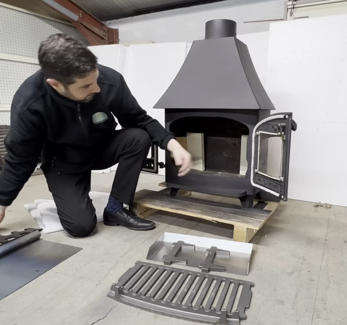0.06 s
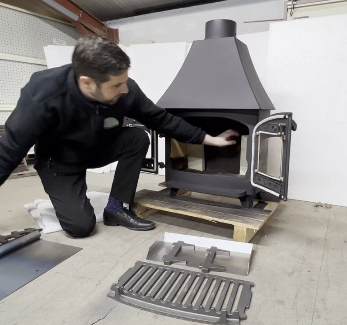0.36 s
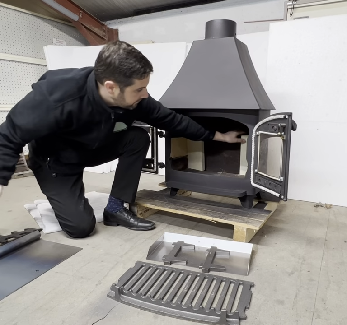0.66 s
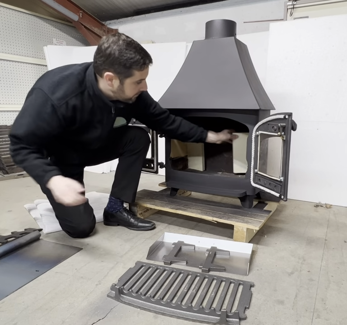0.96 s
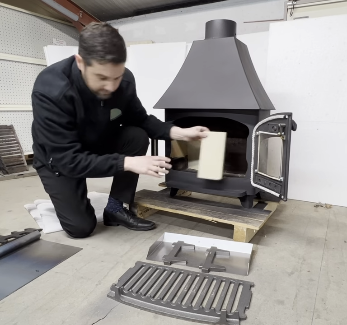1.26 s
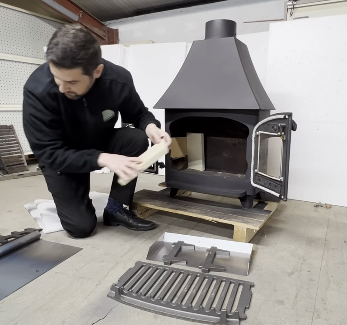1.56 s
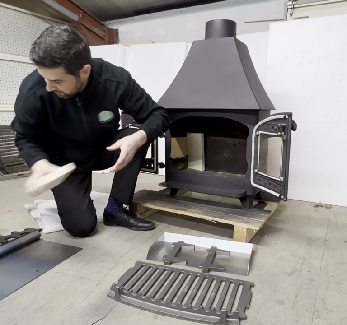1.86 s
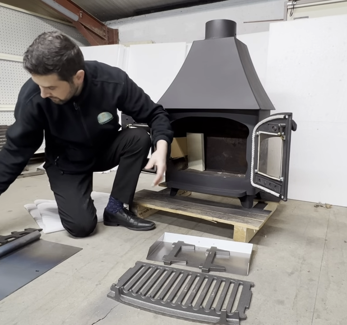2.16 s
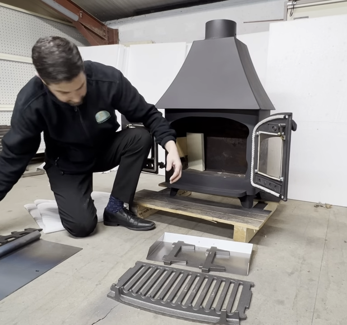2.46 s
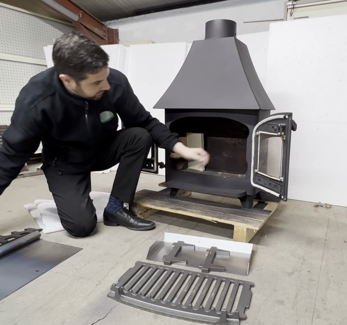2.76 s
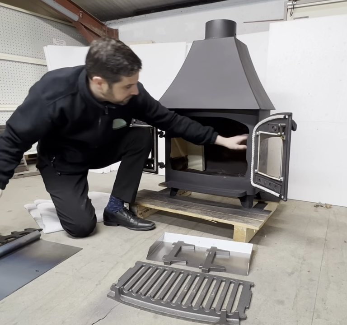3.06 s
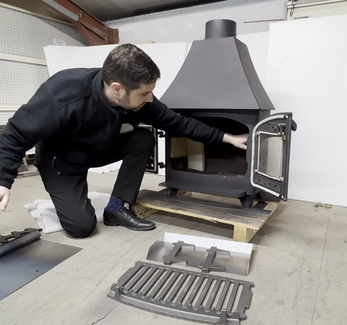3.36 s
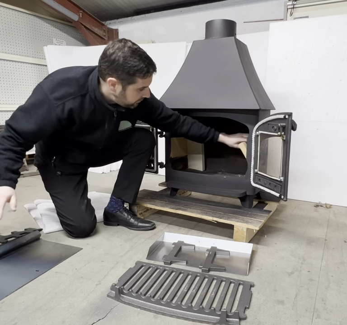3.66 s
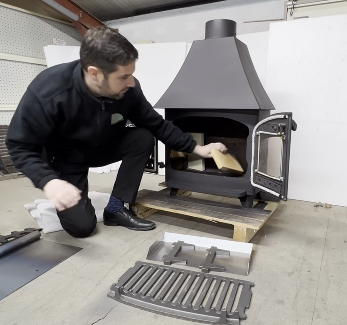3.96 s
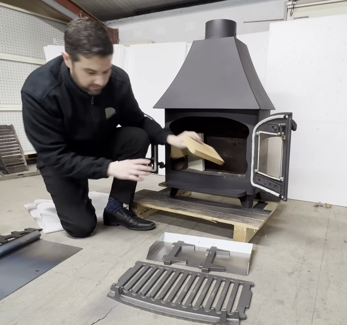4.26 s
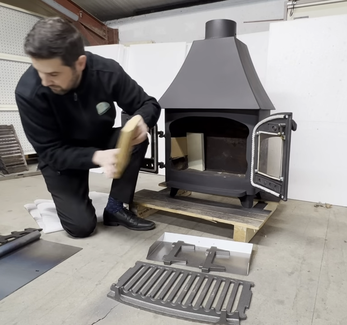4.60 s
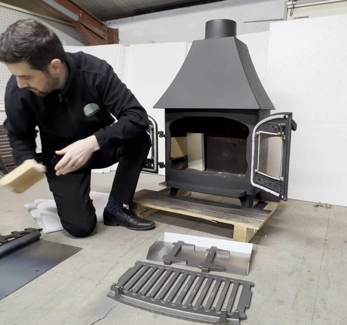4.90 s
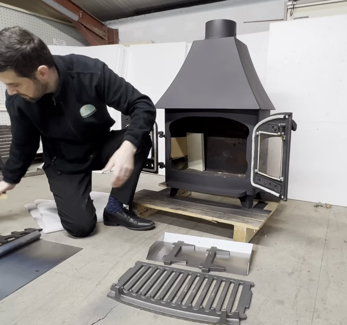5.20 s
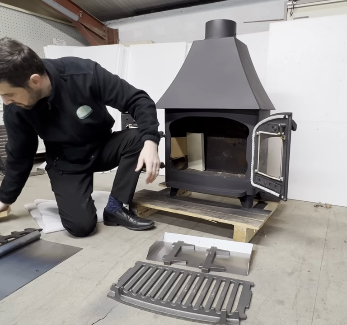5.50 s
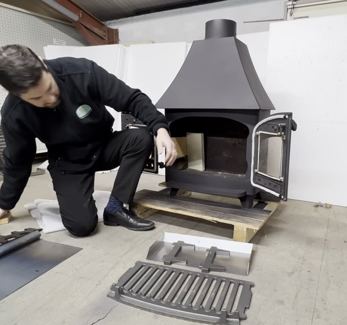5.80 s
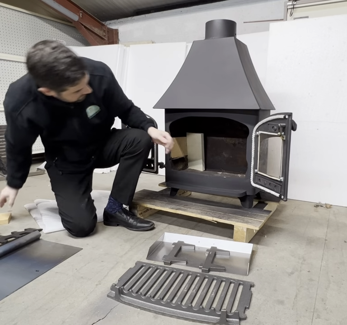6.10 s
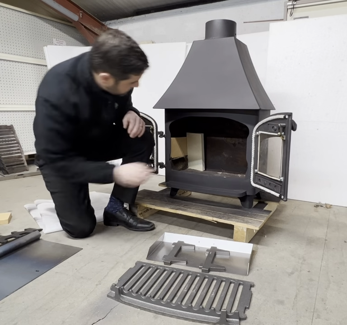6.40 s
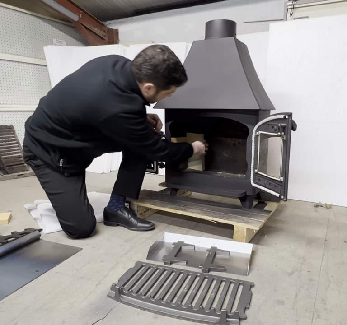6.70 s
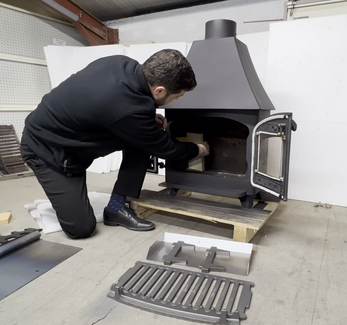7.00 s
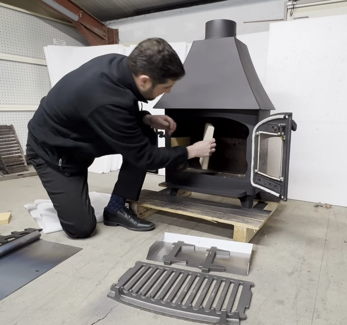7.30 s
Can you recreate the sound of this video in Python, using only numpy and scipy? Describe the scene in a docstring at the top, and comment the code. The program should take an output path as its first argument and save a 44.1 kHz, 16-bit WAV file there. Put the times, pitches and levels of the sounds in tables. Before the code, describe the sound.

Two light bricks are worked out of a metal stove with ringing knocks and gritty scraping, then set down with dull thuds.

```python
"""A dull thud with a sharp tick on top: a light firebrick lands on a workshop floor. Two bricks are worked
out of a steel wood stove. Each knocks in the firebox, whose panels boom and ring, slides through the
hands and lands edge first in a few thuds; the second is dragged free in gritty, faintly squeaking jerks.
A fleece jacket rustles with each reach. A low hum, a rumble and a thin hiss lie under the room."""
import sys
import numpy as np
from scipy import signal
from scipy.fft import rfft, irfft, next_fast_len
from scipy.io import wavfile

SR = 44100
rng = np.random.default_rng(int(sys.argv[2]) if len(sys.argv) > 2 else 0)


def generate_wav(signal):
    """Clip the signal to [-1, 1] and save it as 16-bit WAV at the path in sys.argv[1]."""
    frames = np.transpose(np.atleast_2d(signal))
    scaled = np.clip(frames, -1, 1) * 32767
    pcm = np.round(scaled).astype(np.int16)
    wavfile.write(sys.argv[1], SR, pcm)


N = 328545

# a brick lands edge first, tips onto its face and settles: (time [s], edge [dB], face [dB], settling [dB],
# time to tip [s], then for the edge contact: brightness [Hz], grit [dB], low cut [Hz])
BRICK_LANDINGS = [(0.116, -20, -22.5, -29, 0.026, 815, -49.5, 62),
                  (0.228, -40.5, -46, -44.5, .05, 500, -64.5, 75),
                  (2.4444, -39.5, -45.5, -44.5, 0.097, 500, -71, 92),
                  (5.33, -64.5, -64.5, -72.5, .022, 448, -78, 150),
                  (5.618, -27.5, -21.5, -41.5, .010, 615, -65.5, 190),
                  (5.755, -32.5, -31.5, -44, .011, 430, -68, 200),
                  (5.842, -34.5, -33.5, -38.5, .017, 334, -60.5, 135)]
SETTLE_S = 0.043  # from the fall onto the face to the last contact
DULLING, DEEPENING, GRIT_STEP_DB = 0.53, 0.85, -5.5  # per contact: duller, deeper, less gritty
# a brick knocks in the firebox:
# (time [s], level [dB], brightness [Hz], panel boom [dB], clink [dB], brick [0 or 1])
FIREBOX_KNOCKS = [(0.575, -46, 6000, -10, -12.5, 0), (0.585, -43, 1010, 13, -16, 0),
                  (0.603, -38.5, 507, 7.5, -14, 0), (0.869, -44.5, 960, 0.5, -5.5, 0),
                  (1.2525, -37.5, 8700, 2.5, 0.5, 0), (1.262, -34.5, 1320, 7, -4.5, 0),
                  (1.2782, -50, 4470, -5, 14.5, 0), (3.653, -60, 895, 17, -3, 1),
                  (3.708, -43.5, 12040, 2, -5, 1), (3.738, -34, 1060, 15, 7.5, 1),
                  (3.742, -37.5, 4930, -26, 2, 1), (3.768, -41, 7900, -10, 6.5, 1),
                  (7.001, -62.5, 2800, 10, -8, 0)]
# the second brick is jerked along the steel until it tears free:
# (start [s], length [s], starting level [dB], swell [dB], brightness [Hz])
BRICK_PULLS = [(2.878, .44, -69.5, 16.5, 1670), (3.369, 0.15, -49, -14.5, 9000),
               (3.54, 0.022, -46, -3.5, 13900), (3.596, 0.21, -55, 12.5, 12500),
               (3.705, 0.069, -32, 6.5, 13100)]
GRAB_S, LET_GO_S = 0.0075, 0.0097  # attack and release of a pull
# the dragged brick catches: (centre time [s], level [dB], pitch [Hz], length [s])
DRAG_SQUEAKS = [(3.164, -72, 4150, 0.099), (3.42, -70, 3450, 0.15), (3.46, -69.5, 6160, .24),
                (3.624, -56, 4640, 0.093)]
# hands and sleeves slide over a brick:
# (peak time [s], level [dB], rise [s], fall [s], ring and skin hiss [dB], brick [0 or 1])
HAND_RUBS = [(0.639, -66, 0.041, 0.04, -21, 0), (0.835, -53.5, 0.016, 0.048, -14, 0),
             (0.876, -59, 0.018, 0.012, -12, 0), (1.768, -57.5, 0.077, 0.04, -50, 0),
             (4.6, -64.5, 0.035, 0.028, -7, 1), (4.8, -56, 0.021, 0.033, 6, 1),
             (5.346, -67, .05, 0.043, -12, 1), (5.831, -46, 0.0047, 0.016, -13, 1),
             (5.975, -58, 0.0081, 0.015, -17, 1), (6.155, -63.5, 0.016, 0.029, -21, 0),
             (6.69, -73, 0.035, 0.02, -29, 0), (7.375, -63, 0.0094, 0.063, -11, 0)]
# a brick is patted, gripped or catches lightly: (time [s], level [dB], brightness [Hz], brick [0 or 1])
BRICK_PATS = [(0.709, -71, 7000, 0), (1.516, -77, 4470, 0), (3.138, -77, 5000, 1), (3.54, -64.5, 11000, 1),
              (3.641, -70, 14200, 1), (4.776, -69, 9300, 1), (5.759, -69, 1680, 1), (6.99, -75, 7060, 0)]
# small dry ticks: (time [s], level [dB], pitch [Hz])
DRY_TICKS = [(0.116, -29, 2800), (2.409, -50.5, 3360), (2.583, -52.5, 3870), (4.945, -53, 4440),
             (5.354, -58, 13000), (5.970, -42.5, 4300)]
# the jacket rustles with a reach or turn: (peak time [s], level [dB], length [s])
JACKET_MOVES = [(0.035, -61, 0.82), (0.64, -62.5, 0.55), (1.62, -67, 1), (3.15, -68, 0.49),
                (4.186, -72, 0.2), (5.354, -71.5, 0.42), (6.547, -70.5, 0.69), (6.698, -71.5, .12),
                (7.425, -67, 0.51)]
STIRRING_DB = -76  # the jacket between movements

# modes of the floor under a brick: (frequency [Hz], level [dB], t60 [s])
FLOOR_MODES = [(90.6, -8.5, 0.25), (121.4, -7, 0.16), (168.9, -3, 0.16), (228, 1, 0.083), (330, -12, 0.15),
               (451, -1.5, 0.043), (792, -4.5, 0.073)]
# modes of the steel firebox: (frequency [Hz], level [dB], t60 [s])
STOVE_MODES = [(140.6, 0, 0.38), (155, -2, 0.22), (199.6, -22, 1.24), (249.6, -21.5, 1.04),
               (297.5, -9, 0.453), (321.5, 3, 0.08), (357.8, -2.5, 0.21), (451, -5.5, 0.26),
               (506, -9, 0.19), (719, -13.5, 0.46), (771, 0, 0.11), (896, -22.5, 0.11), (1006, -14.5, 0.25),
               (1028, -8.5, 0.086), (1076, -13, 0.28), (1127, -15.5, 0.38), (1426, -9.5, 0.16),
               (1644, -17.5, 0.34), (1728, -23.5, 0.21), (2146, -20, 0.14), (2520, -20, 0.11),
               (2570, -33, 0.12), (2920, -56, 0.076)]
# ringing tones heard when the first brick (0) or second brick (1) is struck, some steel ring included;
# a list each: (frequency [Hz], level [dB], t60 [s])
CLINK_TONES = [
    [(443, 5.5, 0.18), (500, 2, 0.15), (1350, -6, 0.086), (2275, -6, 0.033), (3607, -9, 0.032),
     (3770, -21.5, 0.039), (3910, 1, 0.023), (3800, -12.5, 0.059), (4900, -17, 0.046), (5900, -20, 0.091),
     (8090, -20, 0.15)],
    [(1635, 0.5, 0.22), (2346, -8.5, 0.13), (2666, -5, 0.16), (2600, -4, 0.06), (3410, -16, 0.059),
     (3980, -3, 0.04), (4130, 1, 0.069), (4760, -2, 0.061), (5610, -4, 0.044), (6205, 6.5, 0.044),
     (6710, -2, 0.074), (8820, -1.5, 0.043)],
]
# steady low tones: (frequency [Hz], level [dB])
HUM_TONES = [(70, -67.5), (97, -63), (194, -84)]

# the dark bloom of a thud: (frequency [Hz], level [dB])
THUMP_EQ = [(25, -42), (55, -1), (100, 1.5), (190, -0.5), (480, -3), (640, -9), (820, -12.5), (1100, -16.5),
            (1500, -19), (2500, -27.5), (8000, -57.5)]
# the wash of dense steel modes: (frequency [Hz], level [dB])
PANEL_EQ = [(40, -3), (110, -11), (350, -3), (620, -5), (900, 3), (1250, -6), (1750, -14.5), (2500, -15),
            (4000, -20), (9000, -20), (15000, -18.5)]
# brick grinding on steel: (frequency [Hz], level [dB])
GRIND_EQ = [(100, -20), (400, 5), (900, -3.5), (1800, 1), (3000, 1), (4400, -5), (6500, -12), (9000, -11.5),
            (15000, -23)]
# grit, dust and brushing on a brick's face: (frequency [Hz], level [dB])
DUST_EQ = [(100, -8), (500, 1), (1500, 1.5), (2700, 4.5), (4200, -2.5), (6500, -2.5), (9000, -12.5),
           (15000, -12.5)]
# the hiss of dry skin: (frequency [Hz], level [dB])
SKIN_EQ = [(2000, -21), (6000, -5), (10000, -1), (15000, -3)]
# rubbing fleece: (frequency [Hz], level [dB])
FLEECE_EQ = [(120, -1), (400, 6), (900, 0), (2000, 1), (3500, -3), (4900, -4), (6000, -1), (8700, -8),
             (15000, -16.5)]
# the air of the workshop: (frequency [Hz], level [dB])
AIR_EQ = [(76, -46), (130, 1.5), (168, -0.5), (188, -0.5), (276, -6), (447, -9), (890, -10.5),
          (1110, -20.5), (1860, -23), (6000, -51.5), (7800, -58), (13200, -120)]
# thin high hiss: (frequency [Hz], level [dB])
HISS_EQ = [(3000, -37), (5500, -27), (6500, -11), (7300, 6), (8000, -13), (9500, -16), (10800, -23),
           (12500, -8.5), (15500, -16.5)]
# the rumble of the building: (frequency [Hz], level [dB])
RUMBLE_EQ = [(20, -20.5), (33, -8), (46, 0.5), (58, -9), (72, 5.5), (85, -0.5), (100, 2), (120, -6.5),
             (170, -51)]
AIR_DB, HISS_DB, RUMBLE_DB = -70, -75, -60.5

# the room's decay: (frequency [Hz], t60 [s])
ROOM_DECAY = [(80, 1), (250, 0.55), (600, 0.59), (1500, 0.5), (4000, 0.53), (8000, 0.35), (14000, 0.16)]
# the tone of the wall reflections: (frequency [Hz], level [dB])
WALL_EQ = [(60, -19), (300, -6), (800, -8.5), (4000, -1), (15000, -2.5)]
# how alike diffuse sound is in both ears: (frequency [Hz], correlation [0 to 1])
EAR_CORRELATION = [(60, .88), (140, .86), (300, .66), (640, .2), (1400, 0), (3000, 0), (9000, 0),
                   (13000, .3)]
# the two microphone ports: (frequency [Hz], response [dB], left minus right [dB])
MIC_EQ = [(101, -2, -1.2), (347, 0, -1.5), (1240, -2, 2.5), (2630, -6.5, 4), (3200, -6.5, 6), (3680, -4, 2),
          (5190, -4.5, 12), (5170, -14, 16.5), (6760, -4, 7), (7680, -10, 10), (8390, 2, 13.5),
          (9220, 2.5, -5), (10940, -14.5, 9.5), (12120, 4.5, 1), (14430, -7.5, 3.5)]
HIGH_CUT_HZ = 15700


def floor_thuds(left_lead_s=0.0004):
    """The floor answers each of a landing's three contacts with a low knock; grit crunches underneath."""
    out, t = np.zeros((2, N)), np.arange(SR) / SR
    slab = unit_hit(ring(FLOOR_MODES, build_cycles=1.6))
    direct = np.array([slab, np.interp(t - left_lead_s, t, slab)])  # arrives from the left
    for s, edge_db, face_db, settle_db, tip_s, bright_hz, grit_db, low_hz in BRICK_LANDINGS:
        contacts = [(0, edge_db), (tip_s, face_db), (tip_s + SETTLE_S, settle_db)]
        for k, (delay, db) in enumerate(contacts):
            thud = direct + amp(3.5) * tail(THUMP_EQ, rise_s=0.0025, early_db=14, early_s=0.04)
            # each later contact of a landing sounds deeper
            low_cut = signal.butter(2, low_hz * DEEPENING ** k, "highpass", fs=SR, output="sos")
            thud = signal.sosfilt(low_cut, soften(thud, bright_hz * DULLING ** k))
            grit = tail(DUST_EQ, rise_s=0.0033, early_db=-17, early_s=0.028)
            add(out, s + delay, amp(db) * unit_hit(thud) + amp(grit_db + k * GRIT_STEP_DB) * grit)
    return out


def firebox_knocks():
    """A knock sets off the big panels' boom, a clink and a wash of dense steel modes."""
    out = np.zeros((2, N))
    boom = ring([mode for mode in STOVE_MODES if mode[0] < 280], build_cycles=0.17)
    steel = ring([mode for mode in STOVE_MODES if mode[0] >= 280], build_cycles=0.84)
    clinks = [unit_hit(ring(tones, build_cycles=1.3)) for tones in CLINK_TONES]
    for s, db, bright_hz, boom_db, clink_db, brick in FIREBOX_KNOCKS:
        clang = amp(boom_db) * boom + steel + amp(clink_db) * clinks[round(brick)]
        wash = amp(-3) * tail(PANEL_EQ, rise_s=0.00058, early_db=24, early_s=0.06)
        add(out, s, amp(db) * soften(in_room(clang, wet_db=-0.5) + wash, bright_hz))
    return out


def brick_drag():
    """Rough brick grinds on steel and both ring; each pull grabs, swells or sags, then lets go."""
    out, t = np.zeros((2, N)), np.arange(SR) / SR
    steel = unit_hit(ring([mode for mode in STOVE_MODES if mode[0] > 280], build_cycles=0.97))
    clink = unit_hit(ring(CLINK_TONES[1], build_cycles=0.93))
    grind = tail(GRIND_EQ, rise_s=0.00045, early_db=15, early_s=0.047)
    body = grind + in_room(amp(-7.5) * steel + amp(-12.5) * clink, wet_db=-11)
    for s, length, db, swell_db, bright_hz in BRICK_PULLS:
        grab = np.minimum(t / GRAB_S, 1)
        swell = amp(db + swell_db * np.minimum(t / length, 1))
        release = np.exp(-np.maximum(t - length, 0) / LET_GO_S)
        scrape = friction(grab * swell * release, body, grains_per_s=1400, spread_db=4)
        add(out, s, soften(scrape, bright_hz))
    return out


def drag_squeaks(flutter_hz=220):
    """Rapid uneven slips settle for a moment on one pitch."""
    out = np.zeros((2, N))
    for s, db, hz, length in DRAG_SQUEAKS:
        t = np.arange(round(length * SR)) / SR
        flutter = soften(rng.standard_normal(len(t)), flutter_hz)
        slips = unit_rms(flutter * np.sin(2 * np.pi * hz * t))
        add(out, s - length / 2, amp(db) * in_room(slips * np.hanning(len(t)), wet_db=-3))
    return out


def hand_rubs():
    """Skin and cloth brush the brick and raise a faint ring; dry skin adds a fine hiss."""
    out, clinks = np.zeros((2, N)), held_clinks()
    for s, db, rise, fall, ring_db, brick in HAND_RUBS:
        t = np.arange(-min(2 * rise, s), 4 * fall, 1 / SR)
        force = amp(db) * np.exp(-np.where(t < 0, (t / rise) ** 2, t / fall))
        skin = amp(-3) * tail(SKIN_EQ, rise_s=0.001, early_db=15.5, early_s=0.015)
        brush = tail(DUST_EQ, rise_s=0.00075, early_db=20, early_s=0.023)
        body = brush + amp(ring_db) * (clinks[round(brick)] + skin)
        add(out, s + t[0], friction(force, body, grains_per_s=4000, spread_db=3))
    return out


def brick_pats():
    """A light pat on a brick gives a clink, with a puff of dust."""
    out, clinks = np.zeros((2, N)), held_clinks()
    for s, db, bright_hz, brick in BRICK_PATS:
        clink = in_room(clinks[round(brick)], wet_db=6)
        dust = amp(5) * tail(DUST_EQ, rise_s=0.00033, early_db=1, early_s=0.0065)
        add(out, s, amp(db) * soften(clink + dust, bright_hz))
    return out


def held_clinks():
    """The clink heard with each brick in the hand: the grip damps any tone below 1 kHz."""
    return [unit_hit(ring([tone for tone in tones if tone[0] > 1000], build_cycles=1.2))
            for tones in CLINK_TONES]


def dry_ticks(decay_s=0.00057):
    """Tiny clicks with almost no ring."""
    out, t = np.zeros((2, N)), np.arange(SR // 20) / SR
    for s, db, hz in DRY_TICKS:
        add(out, s, amp(db) * np.exp(-t / decay_s) * np.sin(2 * np.pi * hz * t))
    return out


def jacket_rustle():
    """Fleece slides on fleece: very fine grains swell and fade with each movement."""
    t = np.arange(N) / SR
    swells = [amp(db) * np.exp(-(2 * (t - s) / length) ** 2) for s, db, length in JACKET_MOVES]
    force = np.sqrt(amp(STIRRING_DB) ** 2 + sum(swell ** 2 for swell in swells))
    fleece = tail(FLEECE_EQ, rise_s=0.0016, early_db=-1, early_s=0.0077)
    return friction(force, fleece, grains_per_s=3300, spread_db=2)[:, :N]


def room_tone():
    """A steady bed of air, thin hiss and building rumble."""
    layers = [(AIR_DB, AIR_EQ), (HISS_DB, HISS_EQ), (RUMBLE_DB, RUMBLE_EQ)]
    return sum(amp(db) * noise(spectrum, N) for db, spectrum in layers)


def hum(waver=0.098):
    """Low steady tones that waver a little in level and phase."""
    out, t = np.zeros(N), np.arange(N) / SR
    for hz, db in HUM_TONES:
        drift = unit_rms(sum(np.cos(2 * np.pi * (rate_hz * t * rng.choice([-1, 1]) + rng.random()))
                             for rate_hz in np.geomspace(0.3, 5, 12)))
        tone = np.sin(2 * np.pi * hz * t + waver * drift[::-1])
        out += amp(db) * unit_rms((1 + waver * drift) * tone)
    return out


def ring(modes, build_cycles):
    """Dying modes; each takes a moment to spread through the body, the low ones longest."""
    t = np.arange(SR) / SR
    return sum((-1) ** k * amp(db - 60 * t / t60) * np.sin(2 * np.pi * hz * t)
               * (1 - np.exp(-t * hz / build_cycles)) for k, (hz, db, t60) in enumerate(modes))


def friction(force, body, grains_per_s, spread_db):
    """Grains of uneven size catch and slip under a force and excite a body."""
    size = len(force)
    grains = rng.standard_normal(size) * amp(spread_db * np.minimum(rng.exponential(1, size), 4))
    catches = unit_rms(grains * (rng.random(size) < grains_per_s / SR))
    return signal.fftconvolve((force * catches)[None], body / np.linalg.norm(body[0]), axes=1)


def in_room(x, wet_db):
    """A sound with the reflections of the walls around it."""
    walls = tail(WALL_EQ, rise_s=0.00082, early_db=25, early_s=0.075)
    wet = signal.fftconvolve(x[None], walls / np.linalg.norm(walls[0]), axes=1)[:, :len(x)]
    return x + amp(wet_db) * wet


def tail(spectrum, rise_s, early_db, early_s):
    """Dense reflections: an early cluster, then the room dying band by band."""
    size = 3 * SR // 5
    hz, frame_s, bands = signal.stft(noise(spectrum, size), SR, nperseg=256)
    decay = amp(-60 * frame_s / curve(ROOM_DECAY, hz)[:, None])
    dying = signal.istft(bands * decay, SR, nperseg=256)[1][:, :size]
    t = np.arange(size) / SR
    envelope = (1 - np.exp(-t / rise_s)) * (1 + amp(early_db) * np.exp(-t / early_s))
    return np.pad(unit_hit(dying * envelope), ((0, 0), (0, SR - size)))


def noise(spectrum, size):
    """Diffuse stereo noise: centred in the bass, wide in the treble."""
    padded = next_fast_len(size, True)
    hz = np.fft.rfftfreq(padded, 1 / SR)
    a, b = rfft(rng.standard_normal((2, padded)))
    alike = np.clip(curve(EAR_CORRELATION, hz), -1, 1)
    mid, side = a * np.sqrt(1 + alike), b * np.sqrt(1 - alike)
    coloured = np.array([mid + side, mid - side]) * amp(curve(spectrum, hz))
    return unit_rms(irfft(coloured, padded)[:, :size])


def microphones(x):
    """The two ports colour the treble, and the left one hears more of it."""
    padded, mics = next_fast_len(N + SR, True), np.array(MIC_EQ)
    hz = np.fft.rfftfreq(padded, 1 / SR)
    colour_db, lean_db = curve(mics[:, :2], hz), curve(mics[:, ::2], hz)
    gains = amp([colour_db + lean_db / 2, colour_db - lean_db / 2])
    return irfft(rfft(x, padded) * gains, padded)[:, :N]


def soften(x, hz):
    """Low-pass: a soft, long contact leaves out the treble."""
    return signal.sosfilt(signal.butter(2, min(hz, SR / 2 - 1), fs=SR, output="sos"), x)


def amp(db):
    """Decibels to gain."""
    return 10 ** (np.asarray(db) / 20)


def unit_rms(x):
    """Scales to an rms of 1."""
    return x / np.sqrt(np.mean(x ** 2) + 1e-20)


def unit_hit(x):
    """Scales a hit to an rms of 1 over its first 50 ms."""
    return x / np.sqrt(np.mean(x[..., :SR // 20] ** 2) + 1e-20)


def curve(points, hz):
    """Reads a table on a log-frequency axis."""
    point_hz, value = np.transpose(points)
    return np.interp(np.log(hz + 1), np.log(point_hz + 1), value)


def add(mix, s, sound):
    """Mixes a sound in at time s."""
    part = mix[:, max(round(s * SR), 0):][:, :sound.shape[-1]]
    part += sound[..., :part.shape[1]]


def scene():
    """The brick work up front, over a quiet workshop bed that leans slightly right."""
    bed = (room_tone() + hum()) * amp([[-0.7], [0.7]])
    bricks = firebox_knocks() + floor_thuds() + brick_drag() + drag_squeaks()
    handling = brick_pats() + hand_rubs() + jacket_rustle() + dry_ticks()
    return microphones(bricks + handling) + bed


def record(dry):
    """A steep high cut takes off the very top of the mix."""
    high_cut = signal.firwin(511, HIGH_CUT_HZ, window=("kaiser", 9), fs=SR)
    return signal.oaconvolve(dry, high_cut[None], "same")


dry = scene()
out = record(dry)
generate_wav(out)
```